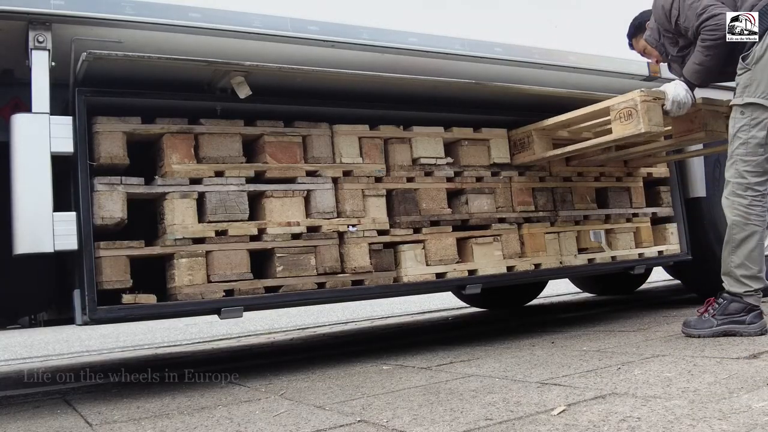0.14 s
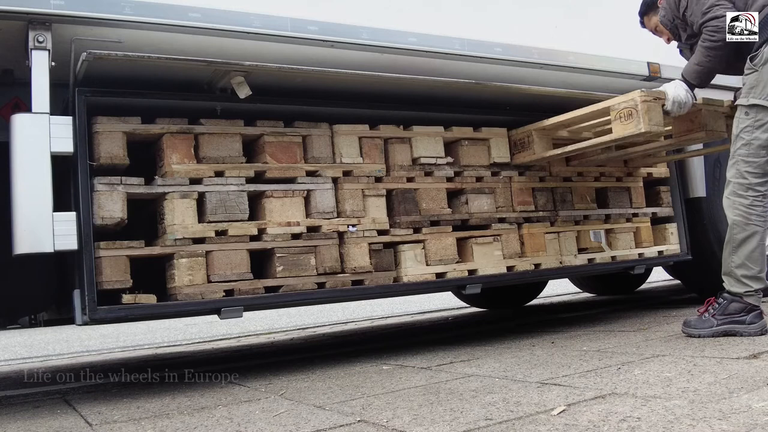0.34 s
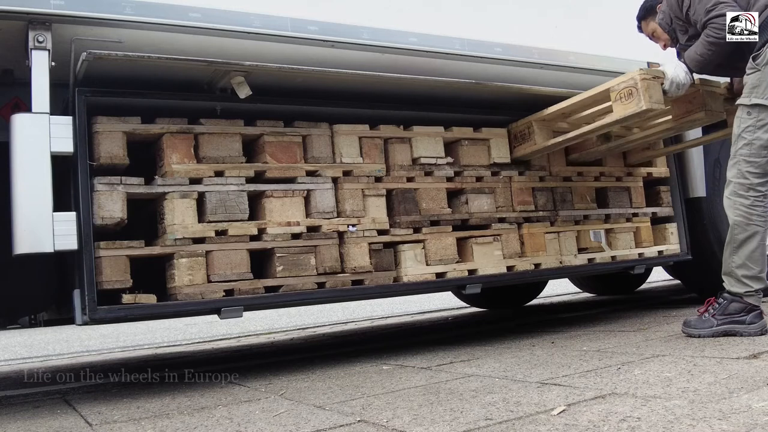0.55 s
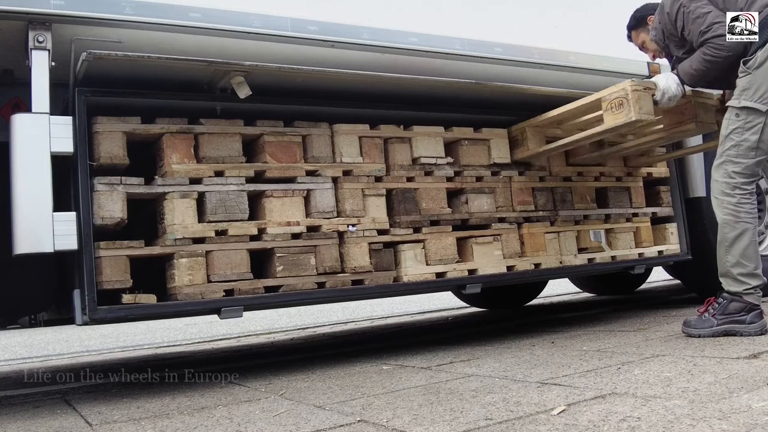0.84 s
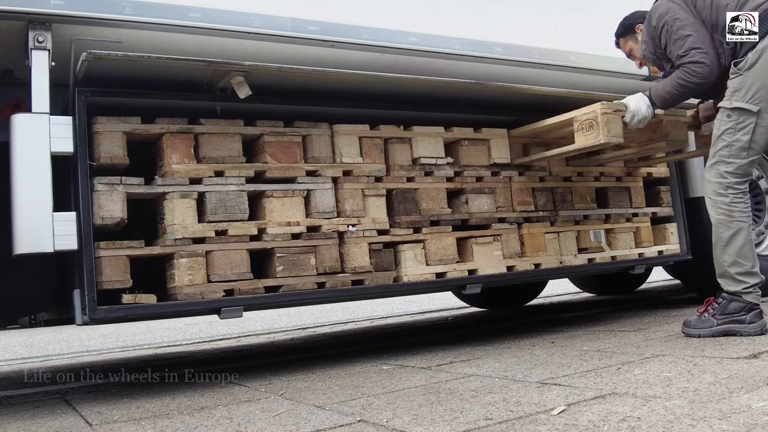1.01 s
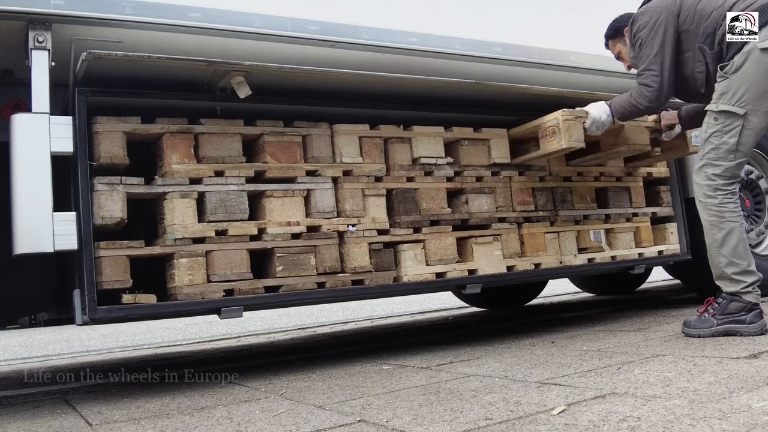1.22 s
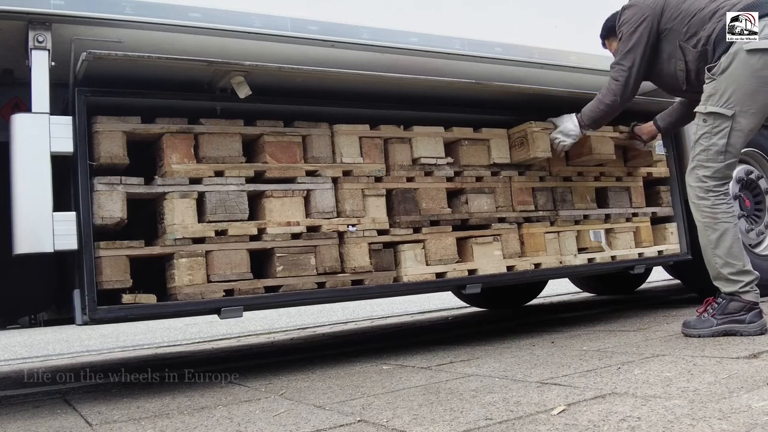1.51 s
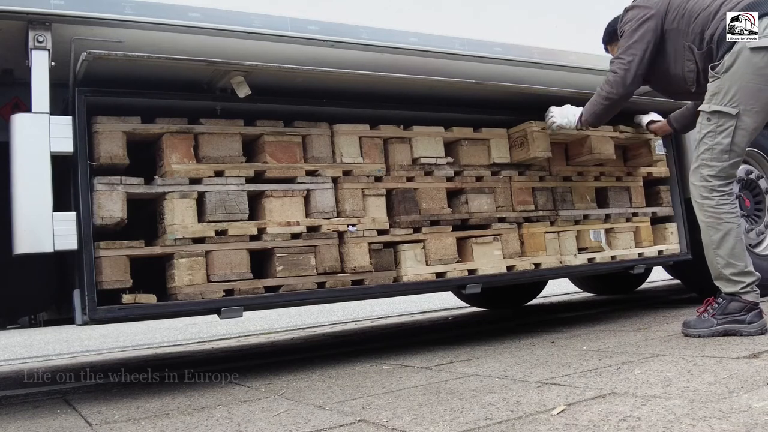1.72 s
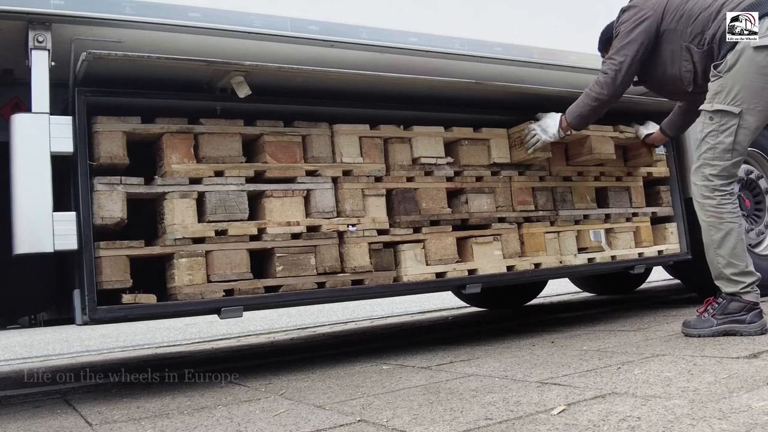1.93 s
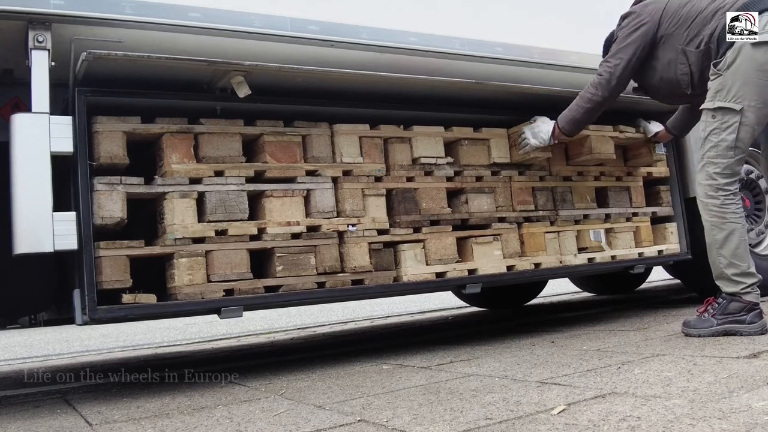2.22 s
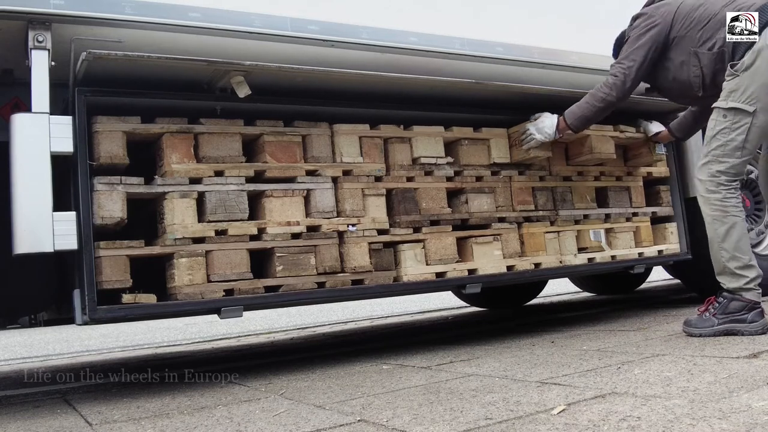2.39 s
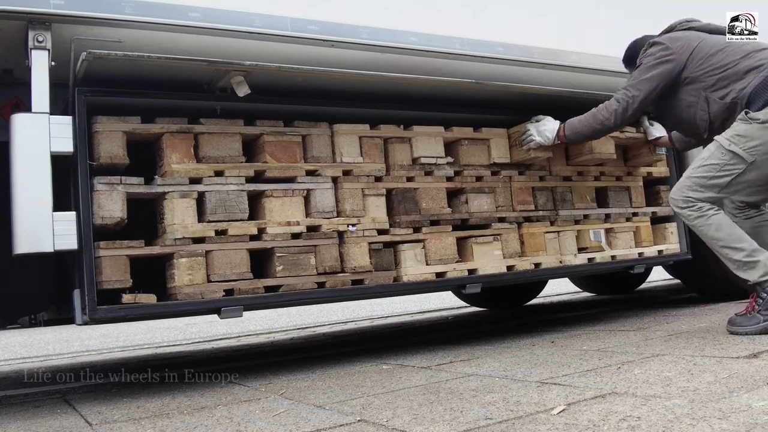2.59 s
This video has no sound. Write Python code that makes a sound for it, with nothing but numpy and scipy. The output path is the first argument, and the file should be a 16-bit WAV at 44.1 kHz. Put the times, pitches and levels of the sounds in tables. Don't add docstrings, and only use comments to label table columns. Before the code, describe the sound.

A wooden pallet is knocked and shoved into a steel box under a trailer: light knocks, a hard clatter, more thuds with scraping, then small ticks; close microphone, outdoors, low distant traffic rumble.

```python
import sys
import numpy as np
from scipy import signal
from scipy.io import wavfile

SR = 44100
rng = np.random.default_rng(int(sys.argv[2]) if len(sys.argv) > 2 else 0)


def gain_from_decibels(decibels):
    exponent = np.asarray(decibels, float) / 20
    return 10 ** exponent


def int16_out(signal):
    q = np.round(np.clip(np.atleast_2d(signal).T, -1, 1) * 32767)
    wavfile.write(sys.argv[1], SR, q.astype(np.int16))


N = 121275


def rms_one(x):
    return x / np.sqrt(np.mean(x ** 2) + 1e-20)


def decay(t60):
    return gain_from_decibels(-60 / (t60 * SR))


def drift(rate_hz):
    r = np.exp(-80 * np.pi * rate_hz / SR)
    slow = signal.lfilter([1], [1, -2 * r, r * r], rng.standard_normal(N // 40 + 2002))[2000:]
    return np.interp(np.arange(N) / 40, np.arange(len(slow)), rms_one(slow))


def ring(clicks, hz, t60):
    r = decay(max(t60, .003))
    w = 2 * np.pi * hz / SR
    return signal.lfilter([0, np.sin(w)], [1, -2 * r * np.cos(w), r * r], clicks + 1e-18)


def band(x, low_hz, high_hz):
    sos = signal.butter(2, [low_hz, min(high_hz, 19000)], "band", fs=SR, output="sos")
    return signal.sosfilt(sos, x)


def swell(start_s, length_s):
    t = np.arange(N) / SR
    return np.exp(-((t - start_s - length_s / 2) / length_s * 2) ** 2)


def random_signs(count):
    return rng.choice([-1, 1], count)


def coloured(sources, spectrum, patchy_db, lead=np.zeros((2, 0))):
    hz, db = np.transpose(spectrum)
    out, together = 0, drift(4)
    edges = 17 * 2 ** np.arange(0, 10.1, .5)
    for k, (low, high) in enumerate(zip(edges, edges[1:])):
        level = np.interp(np.log(low * high) / 2, np.log(hz), db, left=-90)
        flicker = patchy_db * (0.53 * together + drift(9.9))
        noise = np.r_[lead[k % 2], sources[k % 2]]
        out = out + gain_from_decibels(level + flicker) * band(noise, low, high)[-N:]
    return out


# (frequency [Hz], density [dB per Hz])
YARD_SPECTRUM = [(11, -32), (18, 9.5), (72, 0), (156, -48), (1240, -54.5), (1700, -49), (4330, -60.5),
                 (14700, -70), (16000, -89)]
YARD_DB, YARD_PATCH_DB = -28.5, 2.0


def yard():
    white = rng.standard_normal((2, N))
    air = coloured(white, YARD_SPECTRUM, YARD_PATCH_DB, lead=white[:, -SR // 2:])
    return gain_from_decibels(YARD_DB) * rms_one(air)


# (frequency [Hz], level [dB], t60 [s])
ENGINE_NOTES = [
    (59.84, -39.5, 0.91),
    (121, -50.5, 0.54),
]


def hum():
    out = 0
    for hz, db, t60 in ENGINE_NOTES:
        out = out + gain_from_decibels(db) * rms_one(ring(rng.standard_normal(N + SR), hz, t60)[SR:])
    return out


# (time [s], effort [dB], grittiness [dB])
SLIDE = [(0, -57, -0.5), (.25, -57.5, 5), (.45, -59, -4), (.69, -76.5, 17), (.79, -57.5, 7.5),
         (0.951, -54.5, 5.5), (1.2, -39.5, -0.5), (1.45, -43.5, 5), (1.572, -37.5, 0.5), (1.639, -35.5, -5),
         (1.731, -56.5, 11.5), (1.771, -72.5, 10), (2.079, -63, 6.5), (2.14, -58, 12), (2.221, -55.5, 9.5),
         (2.28, -60, -4), (2.499, -60.5, 8), (2.75, -48.5, 0)]
# (frequency [Hz], density [dB per Hz])
SCRAPE_SPECTRUM = [(76, -63), (130, -12.5), (577, -18), (1320, -27.5), (1820, -33), (2050, -30),
                   (3610, -44), (13100, -62.5), (16000, -51.5)]
# (frequency [Hz], level [dB], t60 [s])
BOARD_MODES = [(186.5, 16.5, 0.41), (247.6, 11, 0.21), (368.3, 1.5, 0.14), (442.4, -2, 0.061),
               (581, -1.5, 0.058), (731, -1.5, 0.017), (888, -8, 0.044), (1064.5, -13, 0.08),
               (1239, -9, 0.034), (1276, -9, 0.035), (1640, -11.5, 0.019), (2057, -15, 0.032),
               (2178, -7.5, 0.014), (2760, -11.5, 0.021)]
RUB_DB, RUB_PATCH_DB, GRIT_SPREAD_DB, SNAG_DB = 7, 3.2, 0, -7
SNAGS_PER_S = 440


def scrape():
    s, effort_db, gritty_db = np.transpose(SLIDE)
    t = np.arange(N) / SR
    effort = gain_from_decibels(np.interp(t, s, effort_db))
    grit = rng.standard_normal((2, N)) * gain_from_decibels(GRIT_SPREAD_DB * drift(90))
    rub = coloured(grit, SCRAPE_SPECTRUM, RUB_PATCH_DB)
    rub = rub + (gain_from_decibels(np.interp(t, s, gritty_db)) - 1) * band(rub, 916, 10000)

    caught = rng.random(N) < SNAGS_PER_S * gain_from_decibels(5.0 * drift(12)) / SR
    force = gain_from_decibels(5.0 * np.minimum(rng.exponential(1, N), 4))
    snags = caught * force * random_signs(N)
    dealt = rng.integers(0, len(BOARD_MODES), N)
    rings = 0
    for k, (hz, level, t60) in enumerate(BOARD_MODES):
        rings = rings + gain_from_decibels(level / 2) * ring(snags * (dealt == k), hz, t60 * 0.54)

    rub = rub / np.std(band(rub, 440, 5300))
    return gain_from_decibels(RUB_DB) * effort * (rub + gain_from_decibels(SNAG_DB) * rms_one(rings))


RING_SLOPE_DB = 6.0
MODE_CHANCE_DB, MODE_SPREAD = 2.0, .03


def ringing_boards(touches, centre):
    wood = 0
    chance = rng.standard_normal((2, len(BOARD_MODES)))
    for k, ((hz, level, t60), a, b) in enumerate(zip(BOARD_MODES, *chance)):
        off_centre = np.log2(hz / 250) - centre
        height = gain_from_decibels(level + MODE_CHANCE_DB * a - RING_SLOPE_DB * off_centre ** 2) * (-1) ** k
        pair = ring(touches, hz * (1 + MODE_SPREAD * b), t60)
        pair = pair + ring(touches, hz * (1.07 - MODE_SPREAD * a), t60 * 0.67)
        wood = wood + height * pair
    return wood / np.max(np.abs(wood))


# (time [s], peak level [dB], crack re peak [dB], ring centre [octaves above 250 Hz], rattle [s])
TICKS = [(.079, -50.5, -0.5, 1.7, .006), (.384, -26.5, -46, 1.1, 0.022), (.552, -37.5, -10, 2.5, 0.019),
         (.621, -38.5, -26.5, 3.1, 0.0046), (.743, -38, -17, 3, 0.005), (.777, -35, -5.5, 3.5, 0.038),
         (1.125, -24, -37, 1.16, 0.0065), (1.718, -38, -6, 4.4, 0.019), (1.811, -40.5, -7.5, 2.9, 0.0012),
         (2.037, -33, -16.5, 2.82, 0.015), (2.384, -33.5, -3.5, 3.2, 0.0096), (2.538, -32, -8.5, 3, 0.0064),
         (2.554, -32, -7, 3.16, .004), (2.605, -36, -7, 4.1, 0.016), (2.621, -31.5, -18, 3.4, .003),
         (2.72, -36.5, -5, 4.4, 0.0025), (2.739, -35.5, -9, 3.4, 0.0068)]
KNOCKS = [(.194, -19.5, -18.5, 2.27, 0.0067), (.284, -18, -61, 0.84, 0.014), (.314, -19.5, -35, 1.6, 0.086),
          (.338, -15, -41, 2.8, 0.0096), (.585, -11.5, -24, 1.64, 0.0035), (.655, -16.5, -38, 0.78, 0.0043),
          (.81, -16.5, -37, 2.02, 0.0089), (.825, -9.5, -42, 1.48, 0.013), (.843, -15, -29.5, 2.47, 0.0098),
          (.861, -1.5, -35, 2.72, 0.022), (.874, -5, -51.5, 2.12, 0.012), (.979, -6, -29, 1.83, 0.0067),
          (1.147, -9.5, -34, 1.44, 0.0018), (1.225, -11, -32, 2.06, 0.029), (1.243, -13, -43, 1.08, 0.028),
          (1.367, -11, -31, 2.1, 0.011), (1.54, -33, -25.5, 2.3, 0.022), (1.599, -11.5, -21, 2.16, 0.015),
          (1.635, -11, -26.5, 1.8, 0.011), (1.645, -15.5, -42, 1.38, 0.025)]
KNOCK_DB, TOUCHES_PER_S = -2, 900
REBOUND = .6
CLEAN_BLOW_S = .008
CRACK_DB, CRACK_T60_S = -3, 0.017
CRACK_RISE = .25
SNAP = 2.5
TAIL_DB, TAIL_T60_S = -11.5, 0.074


def knocks(table):
    out, t = np.zeros(N + SR), np.arange(SR // 4) / SR
    for s, db, crack_db, centre, rattle in table:
        rattle = max(rattle, .001)
        met, force = rng.random((2, len(t)))
        hiss, thud = rng.standard_normal((2, len(t)))
        fade = np.exp(-(t / rattle) ** 2)
        touches = (met < TOUCHES_PER_S / SR) * (2 * force - 1) * fade * REBOUND
        touches[0] = REBOUND * min(1, CLEAN_BLOW_S / rattle)
        wood = ringing_boards(touches, centre)

        shaken = signal.lfilter([1], [1, -decay(CRACK_T60_S)], np.abs(touches))
        shaken = shaken / shaken.max() * (1 - np.exp(-t / (CRACK_RISE * rattle)))
        hiss = rms_one(band(hiss, 2400, 21700) + 1.8 * band(hiss, 3800, 7300))
        snap = band(touches, 2100, 9100)
        crack = gain_from_decibels(crack_db + CRACK_DB) * (hiss * shaken + SNAP * snap / snap.max())

        thud = rms_one(band(thud, 110 * 2 ** centre, 450 * 2 ** centre))
        tail = gain_from_decibels(TAIL_DB - 60 * t / TAIL_T60_S) * thud * (1 - np.exp(-500 * t))
        i = int(s * SR)
        out[i:i + len(t)] += gain_from_decibels(db + KNOCK_DB) * (wood + crack + tail)
    return out[:N]


# (time [s], length [s], frequency [Hz], level [dB])
SQUEAKS = [
    (0.141, 0.046, 1250, -53),
    (1.841, 0.084, 1630, -53),
    (2.558, 0.018, 14800, -55),
]


def squeaks():
    out = 0
    for s, length, hz, db in SQUEAKS:
        out = out + gain_from_decibels(db) * swell(s, length) * rms_one(ring(rng.standard_normal(N), hz, 0.027))
    return out


def dying(at, db, t60, low_hz, high_hz):
    clicks = np.zeros(N)
    clicks[at] = gain_from_decibels(db)
    noise = rng.standard_normal(N)
    noise = noise * signal.lfilter([1], [1, -decay(t60)], clicks)
    noise = band(band(noise, low_hz, high_hz * 3.22), low_hz, high_hz)
    return noise * np.sqrt(SR / 2 / (high_hz - low_hz))


# (time [s], low modes [dB], panel modes [dB], upper modes [dB])
SHOVES = [(0.213, -14, -41, -25.5), (0.299, -14, -21, -20.5), (0.411, -16.5, -14, -34.5),
          (0.5, -18.5, -16.5, -36.5), (0.571, -30, -33, -24), (0.647, -19.5, -21, -19.5),
          (0.708, -15.5, -42, -59), (0.858, -37, -42, -10.5), (0.883, -3, -26, -5),
          (0.977, -10.5, -8.5, -16), (1.049, -11.5, -34, -41), (1.149, -9, -6, -36),
          (1.198, -8.5, -2.5, -23.5), (1.291, -28, -40, -13), (1.4, -15, -4, -40), (1.465, -24, -18.5, -23),
          (1.602, -9.5, -0.5, -11), (1.649, -4, -2, -15), (1.71, -5.5, 1.5, -34), (1.788, -19, -5.5, -31.5),
          (1.871, -42, -37, -29.5), (2.12, -32, -28, -31.5), (2.28, -41, -26, -51), (2.431, -20, -53, -40)]
# (frequency [Hz], level [dB], t60 [s])
BOX_LOW = [(26.5, 1, 0.26), (38.7, 5, 0.39)]
BOX_PANEL = [(58.26, -5.5, 0.41), (68, -12.5, 1)]
BOX_UPPER = [(96.7, -6, 0.62), (121.6, -3.5, 0.62), (160.3, -5, 0.31)]
# (lowest [Hz], highest [Hz])
HOLLOW_HZ = (106, 420)
HOLLOW_DB, HOLLOW_T60_S = -13, 0.41
SWAY_DB, SWAY_T60_S = -16, 1
SHOVE_SOFT_HZ = 148


def box():
    rows, out = np.array(SHOVES), 0
    at = (rows[:, 0] * SR).astype(int)
    for column, modes in enumerate([BOX_LOW, BOX_PANEL, BOX_UPPER], 1):
        for hz, db, t60 in modes:
            clicks = np.zeros(N)
            clicks[at] = gain_from_decibels(rows[:, column] + db - 4.5) * random_signs(len(rows))
            out = out + ring(clicks, hz, t60)
    boom = signal.sosfilt(signal.butter(2, SHOVE_SOFT_HZ, fs=SR, output="sos"), out)
    hollow = dying(at, rows[:, 3] + HOLLOW_DB, HOLLOW_T60_S, *HOLLOW_HZ)
    sway = dying(at, rows[:, 1] + SWAY_DB, SWAY_T60_S, 27, 96.8)
    return boom + hollow + sway


# (time [s], frequency [Hz], peak level [dB], t60 [s])
PLANKS = [(.284, 910, -26.5, 0.017), (.339, 2440, -17, 0.0056), (.586, 710, -17, 0.013),
          (.586, 1035, -13, 0.017), (.586, 2630, -23.5, 0.011), (.5855, 4250, -27.5, 0.0036),
          (.814, 1480, -22, 0.014), (.8258, 2220, -26, .012), (.829, 1200, -10.5, 0.0086),
          (.8615, 1424, -4, 0.017), (.862, 2570, -12, 0.0095), (.862, 4210, -22, 0.011),
          (.875, 1350, -18, .014), (.877, 2600, -14, 0.0066), (.9798, 2890, -19, 0.025),
          (.9812, 770, -5.5, 0.0098), (.984, 2200, -15, 0.0093), (.987, 1340, -12.5, 0.0066),
          (1.1473, 690, -5, 0.017), (1.1475, 1630, -31, 0.034), (1.226, 815, -11, 0.0088),
          (1.229, 1590, -18.5, 0.016), (1.368, 648, -10.5, 0.026), (1.633, 557, -10.5, 0.019),
          (1.636, 1870, -15, 0.017), (1.642, 1100, -18, 0.027)]
# (time [s], frequency [Hz], peak level [dB])
SPECKS = [(.709, 5160, -53), (.72, 5150, -48), (.744, 5060, -49), (.743, 1960, -39), (.779, 6800, -46),
          (1.718, 3920, -43.5), (2.041, 1165, -33), (.623, 2880, -45), (2.623, 5850, -44.5),
          (2.622, 2770, -41), (2.684, 6050, -45), (2.721, 10200, -52), (2.723, 3040, -36),
          (2.737, 2860, -39)]
SPECK_T60_S = 0.019
CONTACT_CYCLES = 0.26


def pings(table):
    out = np.zeros(N)
    for s, hz, db, t60 in table:
        push = np.hanning(int(CONTACT_CYCLES * SR / hz) + 3)
        note = ring(np.r_[push, np.zeros(SR // 10)], hz, t60)
        i = int(s * SR)
        out[i:i + len(note)] -= (gain_from_decibels(db) * note / note.max())[:N - i]
    return out


# (time [s], length [s], level [dB], lowest [Hz], highest [Hz])
RASPS = [(0.872, 0.092, -45.5, 1180, 3800), (1.273, 0.079, -59.5, 1500, 6500),
         (1.38, 0.19, -56, 1480, 7700), (0.486, .05, -61, 1440, 1730), (0.773, 0.04, -60, 3000, 12000),
         (1.014, 0.053, -58, 3000, 9000), (1.149, .04, -55, 3000, 14000), (1.196, 0.051, -53, 4000, 15000),
         (1.55, 0.028, -51, 2000, 14000), (2.122, .12, -55.5, 1790, 7800),
         (2.382, 0.12, -68.5, 4000, 15000), (2.512, 0.07, -53.5, 3000, 15000),
         (2.634, 0.13, -59.5, 3960, 7500)]
RASP_GRAINS_PER_S, RASP_SPREAD_DB = 5000, 3.0


def rasps():
    caught = rng.random(N) < RASP_GRAINS_PER_S / SR
    force = gain_from_decibels(RASP_SPREAD_DB * np.minimum(rng.exponential(1, N), 4) + 2 * drift(40))
    grains = caught * force * random_signs(N)
    out = 0
    for s, length, db, low_hz, high_hz in RASPS:
        bright = band(band(grains, low_hz, high_hz), low_hz, high_hz)
        out = out + gain_from_decibels(db) * swell(s, length) * rms_one(bright)
    return out


# (delay [s], level [dB])
ECHOES = [
    (.011, -14),
    (.023, -18),
    (.041, -21),
]
ECHO_DULL = .8


def echoes(hits):
    dull = signal.lfilter([1 - ECHO_DULL], [1, -ECHO_DULL], hits)
    return sum(gain_from_decibels(db) * np.r_[np.zeros(int(s * SR)), dull][:N] for s, db in ECHOES)


def scene():
    specks = [(*row, SPECK_T60_S) for row in SPECKS]
    hits = knocks(KNOCKS) + knocks(TICKS) + pings(PLANKS) + pings(specks)
    return (hits + echoes(hits) + box() + scrape() + squeaks() + yard() + rasps() + hum())[None]


def top_cut(x):
    return signal.sosfilt(signal.butter(12, 16700, fs=SR, output="sos"), x)


MIC_CUT_HZ, TOP_HZ = 15.7, 15900


def record(dry):
    cut = signal.sosfilt(signal.butter(2, MIC_CUT_HZ, "high", fs=SR, output="sos"), dry)
    rounded = 1.5 * np.tanh(cut / 1.5)
    mix = signal.sosfilt(signal.ellip(10, .3, 60, TOP_HZ, fs=SR, output="sos"), rounded)
    return top_cut(mix)


dry = scene()
out = record(dry)
int16_out(out)
```